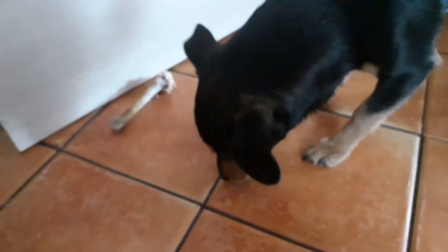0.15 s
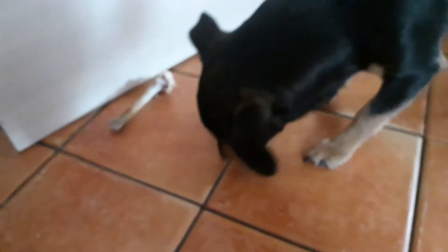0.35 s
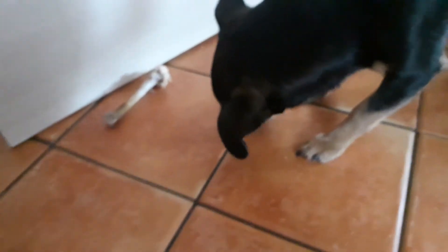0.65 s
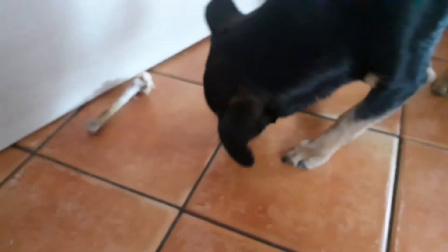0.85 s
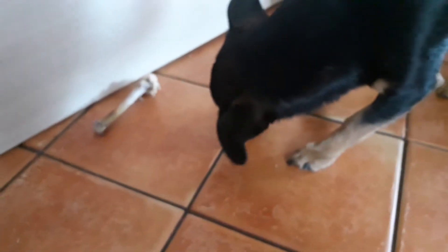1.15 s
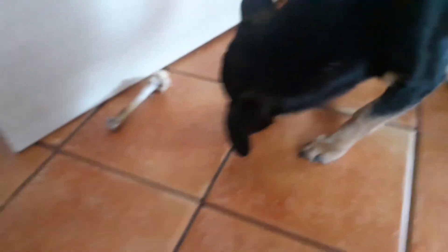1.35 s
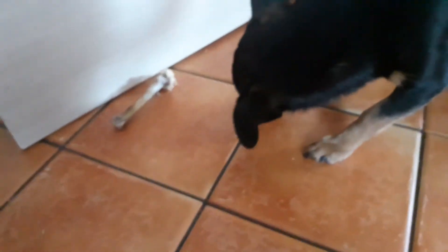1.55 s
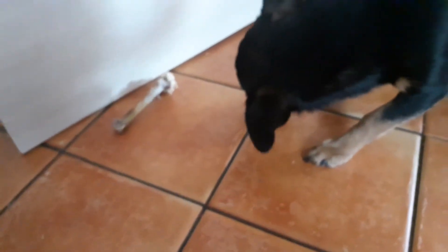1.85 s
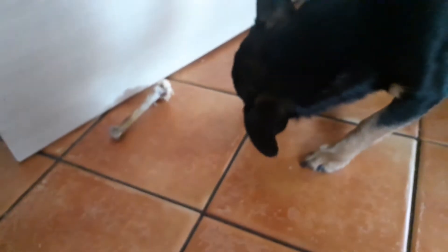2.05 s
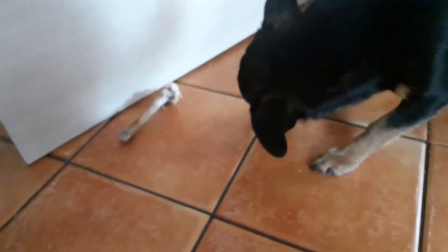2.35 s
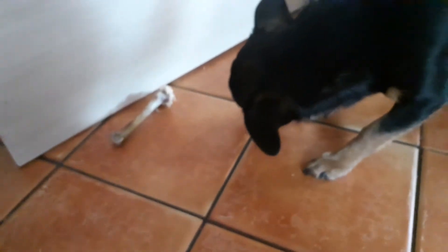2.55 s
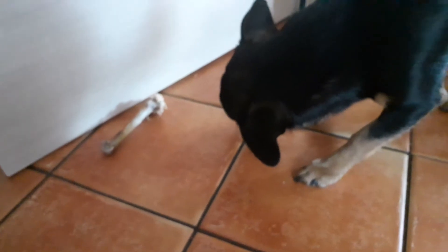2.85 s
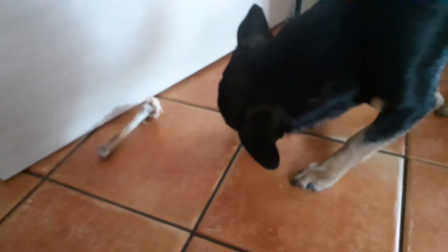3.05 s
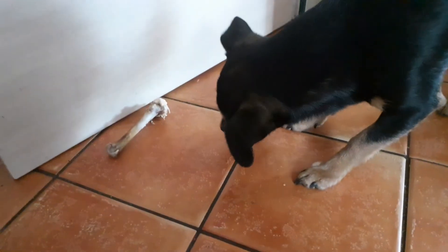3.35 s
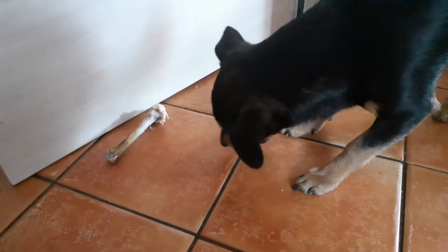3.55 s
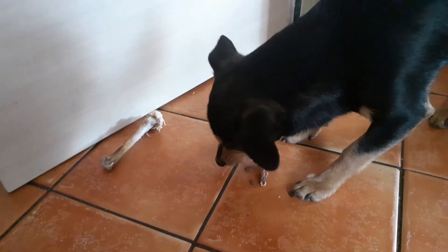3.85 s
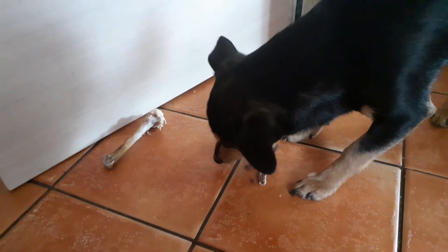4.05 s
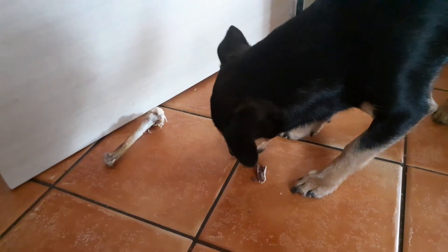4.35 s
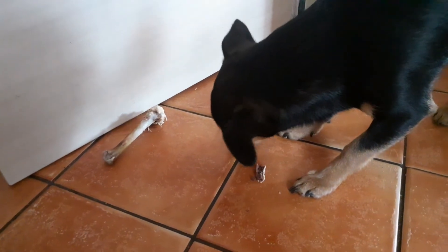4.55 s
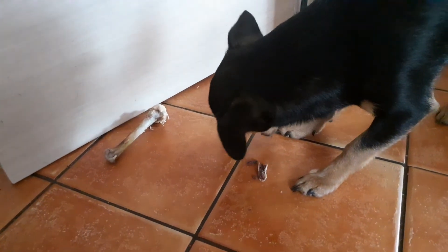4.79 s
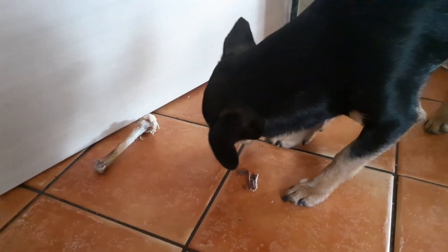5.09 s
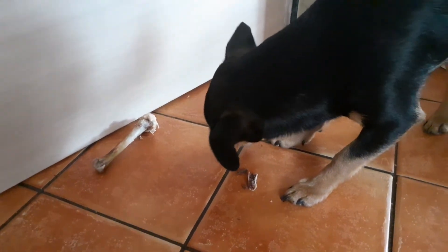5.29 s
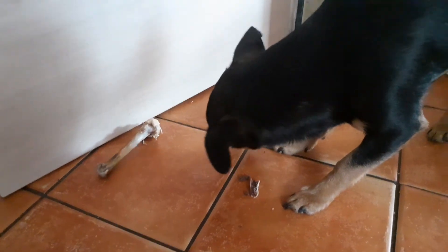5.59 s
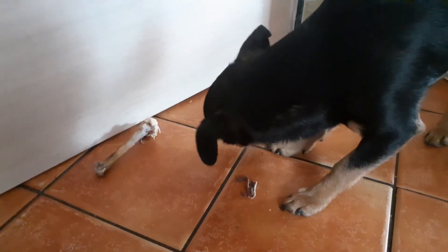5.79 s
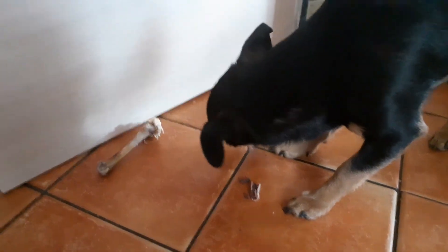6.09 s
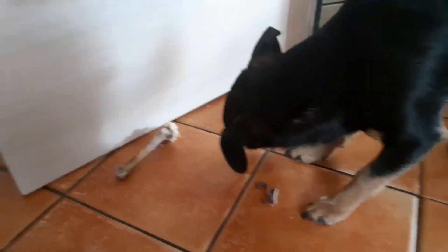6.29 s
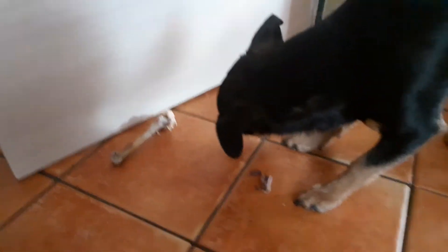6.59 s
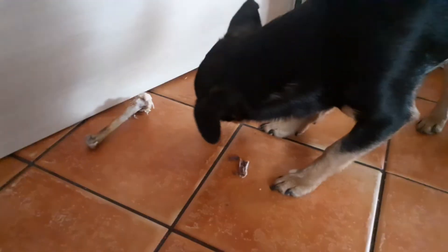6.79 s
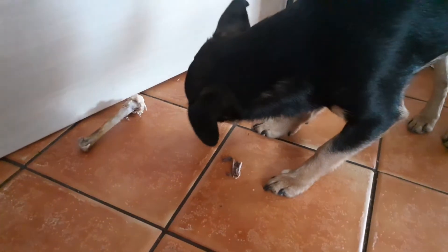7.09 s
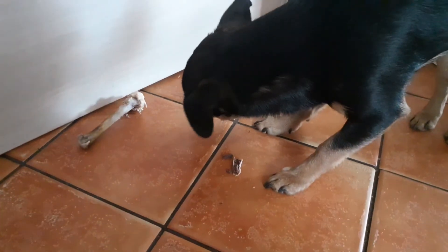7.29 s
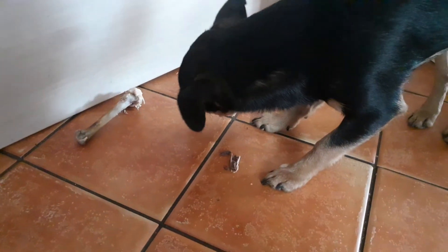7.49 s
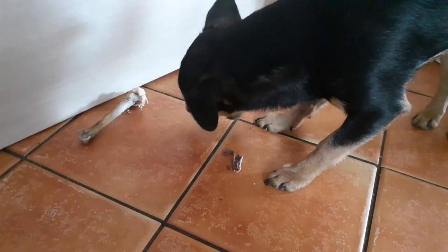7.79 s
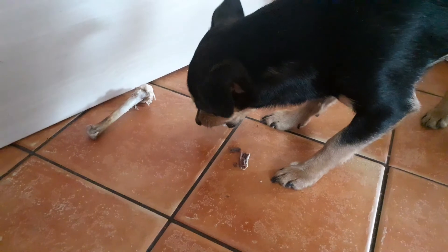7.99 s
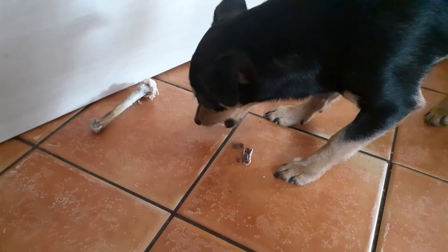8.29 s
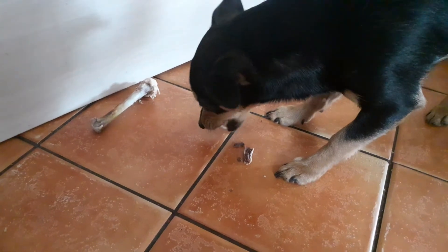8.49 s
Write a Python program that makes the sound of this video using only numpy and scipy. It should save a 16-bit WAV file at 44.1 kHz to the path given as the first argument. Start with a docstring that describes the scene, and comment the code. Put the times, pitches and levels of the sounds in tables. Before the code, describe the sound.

A dog chews a hard bone up close, with sharp irregular cracks and soft wet mouth clicks in a small tiled room.

```python
"""A dog cracks a hard bone between its back teeth, close to a small stereo microphone in a small tiled room.
Each crack is a short burst of fractures that rings the bone and the hollow of the mouth; the jaw knocks
under hard bites. Spit clicks, smacks and squelches in between; late on come a dull thump and a low grunt.
The tiles answer with near echoes and a short bright tail, over a distant low hum and a faint hiss."""
import sys
import numpy as np
from scipy import signal
from scipy.fft import rfft, irfft
from scipy.io import wavfile
from scipy.ndimage import uniform_filter1d

SR = 44100
rng = np.random.default_rng(int(sys.argv[2]) if len(sys.argv) > 2 else 0)


def transcribe(u):
    """Save the signal u as a 16-bit wav file named by the first command-line argument.

    u: samples, shape (n,) or (channels, n), limited to [-1, 1]; the rate is SR.
    q: integer samples, one column per channel.
    """
    v = np.clip(np.atleast_2d(u).T, -1, 1)
    q = np.round(v * 32767).astype(np.int16)
    wavfile.write(sys.argv[1], SR, q)


N = 381024

# cracks, levels relative: t/s, bone level/dB, bright splinter level/dB, mouth hollow level/dB,
# hollow f/Hz, f/Hz of the piece that breaks off
CRACKS = [(0.018, -46, -67, -39, 1480, 4200), (0.0288, -50, -48, -35.5, 1510, 4200),
          (0.312, -45.5, -43, -47.5, 1080, 3070), (0.398, -49, -70, -40.5, 1490, 2800),
          (0.9234, -40.5, -43.5, -46, 1290, 2940), (1.6638, -53, -52, -53.5, 1710, 2900),
          (1.703, -44, -44, -45, 2020, 2700), (1.846, -43, -44, -49, 1910, 3000),
          (1.8571, -27.5, -23, -33, 1830, 7600), (1.917, -27.5, -25.5, -33.5, 1850, 10900),
          (1.949, -28.5, -22.5, -41, 1960, 8400), (1.984, -27.5, -34, -49, 1650, 3430),
          (1.9891, -24, -18, -29.5, 1900, 9300), (2.0059, -22.5, -19.5, -33, 1970, 10800),
          (2.166, -43.5, -37.5, -64, 2030, 5300), (2.238, -38, -25.5, -40, 1640, 4200),
          (2.3278, -30.5, -25.5, -44.5, 1560, 12500), (2.4576, -60, -59, -50, 1540, 2700),
          (2.4767, -45.5, -39.5, -70, 1610, 8100), (2.708, -47, -42.5, -59, 1270, 14000),
          (2.7742, -35, -27.5, -42, 1440, 3220), (2.8826, -42.5, -38.5, -55.5, 1500, 6950),
          (2.9633, -46.5, -44.5, -76, 1210, 5640), (3.037, -48, -41, -62, 1540, 6300),
          (3.0702, -15, -13.5, -23, 1913, 5830), (3.3594, -66, -60, -51.5, 1760, 4950),
          (3.45, -68, -70, -58.5, 1560, 3170), (3.5453, -55, -62, -58, 2090, 5100),
          (3.6972, -53, -62, -49.5, 1800, 2700), (4.0168, -59, -87.5, -59, 1830, 2700),
          (4.0933, -47, -49.5, -54.5, 2640, 3480), (4.181, -47.5, -42, -48, 1730, 7000),
          (4.2428, -52, -43.5, -45, 1280, 10040), (4.5007, -44, -43, -46.5, 1530, 5650),
          (4.8381, -54, -47.5, -46.5, 1840, 8200), (4.9155, -39.5, -34, -40.5, 1830, 2700),
          (5.0332, -20.5, -22.5, -38, 2500, 6330), (5.1228, -12, -10.5, -24, 1520, 5300),
          (5.1971, -19, -15.5, -18.5, 1590, 5460), (5.264, -22.5, -19, -36.5, 1520, 3430),
          (5.3001, -32, -42, -25, 1593, 2700), (5.412, -40, -50, -51, 1720, 4050),
          (5.5482, -42, -43, -79, 1660, 4800), (5.6121, -64, -56, -53.5, 1580, 5000),
          (5.702, -40, -43.5, -53, 1700, 6200), (5.7948, -48.5, -39.5, -60, 1730, 5300),
          (5.817, -42.5, -48, -52.5, 1990, 3170), (6.0627, -45.5, -37, -62, 1690, 5860),
          (6.0864, -50, -47, -46.5, 2610, 2970), (6.4919, -53, -46, -53, 1694, 4900),
          (6.653, -54.5, -51.5, -52.5, 1570, 2700), (7.228, -68, -55, -55, 1750, 6200),
          (7.2618, -55, -53, -57, 1680, 5500), (7.3043, -23, -13, -22.5, 1593, 8300),
          (7.3618, -32.5, -46, -40, 1460, 5600), (7.4104, -20, -19.5, -34, 1700, 4800),
          (7.8155, -40, -41.5, -55, 1680, 5300), (8.2591, -34.5, -34, -56, 2170, 3360),
          (8.322, -46, -45, -53, 1740, 5800), (8.3684, -64, -58, -48.5, 1650, 2700),
          (8.528, -45.5, -39.5, -60, 1820, 5250), (8.5676, -43.5, -43, -66, 1630, 5840)]
# edges of half-octave bands: f/Hz
BAND_EDGES = 30 * 2 ** np.arange(0, 9.6, .5)


def from_db(db):
    """Gain of a level in dB."""
    return 10 ** (np.asarray(db) / 20)


def unit_rms(x):
    """The signal scaled to rms 1."""
    return x / np.sqrt(np.mean(x ** 2) + 1e-20)


def in_time(rows):
    """Each column after t/s, interpolated sample by sample."""
    times, *columns = np.transpose(rows)
    return [np.interp(np.arange(N) / SR, times, column) for column in columns]


def at_hz(points, hz):
    """A curve read on a log frequency axis."""
    freqs, values = np.transpose(points)
    return np.interp(np.log(hz), np.log(freqs), values)


def band(x, low, high):
    """Band-pass from low to high Hz."""
    return signal.sosfilt(signal.butter(2, [low, high], "band", fs=SR, output="sos"), x)


def resonate(x, hz, width_hz):
    """A resonance with gain 1 at its peak."""
    r = np.exp(-np.pi * width_hz / SR)
    poles = [1, -2 * r * np.cos(2 * np.pi * hz / SR), r * r]
    return signal.lfilter([(1 - r * r) / 2, 0, (r * r - 1) / 2], poles, x + 1e-18)


def drift(rate_hz):
    """A slow random wander with spread 1, drawn every 40 samples."""
    r = np.exp(-80 * np.pi * rate_hz / SR)
    slow = signal.lfilter([1], [1, -2 * r, r * r], rng.standard_normal(N // 40 + 2002))[2000:]
    return np.interp(np.arange(N) / 40, np.arange(len(slow)), unit_rms(slow))


def add(track, s, sound):
    """Mixes a sound in at s seconds."""
    i = round(s * SR)
    track[i:i + len(sound)] += sound[:N - i]


def banded_noise(spectrum, flicker_db):
    """Half-octave bands of stereo noise, each with its own level and flicker; rms 1."""
    # the channels are most alike in the bass: f/Hz, left-right correlation
    likeness = [(40, 0.87), (300, 0.78), (1000, 0.25), (3000, 0.091), (16000, 0.05)]
    out, white = 0, rng.standard_normal((2, 2, N))
    for k, (low, high) in enumerate(zip(BAND_EDGES, np.minimum(BAND_EDGES[1:], .45 * SR))):
        mid, side = band(white[k % 2], low, high)
        hz = np.sqrt(low * high)
        alike = at_hz(likeness, hz)
        gain = from_db(at_hz(spectrum, hz) + flicker_db * drift(8.9))
        out = out + gain * (np.sqrt(1 + alike) * mid + np.sqrt(1 - alike) * side * [[1], [-1]])
    return unit_rms(out)


def hum():
    """Low room tone with the wavering lines of a distant appliance, a little to the left."""
    # room tone spectrum: f/Hz, relative density/dB
    spectrum = [(18, -43), (30, -13.5), (99, -1.5), (128, 2.5), (211, -13.5), (248, 1), (296, -12),
                (416, -10), (478, -11.5), (1400, -14), (1610, -17), (2210, -24.5), (3500, -37.5),
                (4550, -64), (7700, -120)]
    # its slow rise and fall: t/s, level/dB
    levels = [(0.0, -57), (5.4, -58.5), (8.64, -54.5)]
    # motor lines: f/Hz, level/dB
    lines = [(128, -69), (256, -74.5), (413, -75.5)]
    level_db, = in_time(levels)
    tone = from_db(level_db) * banded_noise(spectrum, flicker_db=2.5)
    motor = sum(from_db(db) * unit_rms(resonate(rng.standard_normal(N), hz, 2.6)) for hz, db in lines)
    return (tone + motor) * from_db([[.8], [-.8]])


def hiss():
    """A faint, wide, nearly steady hiss."""
    # hiss spectrum: f/Hz, relative density/dB
    spectrum = [(880, -37.5), (1500, -9), (2240, -9.5), (3250, -12.5), (4270, -15), (7980, -15),
                (9420, -31.5), (11600, -0.5), (15500, -19)]
    return from_db(-69.5) * banded_noise(spectrum, flicker_db=.6)


def chewing():
    """Gain of the wet clicks: steady chewing plus the splinters that crunch on after each crack."""
    # chewing effort: t/s, click level/dB
    effort = [(0.0, -69), (1.3, -69.5), (2.2, -67), (2.75, -72.5), (3.6, -72.5), (3.95, -77.5),
              (4.3, -70.5), (4.9, -65.5), (5.75, -72), (6.0, -64.5), (6.3, -73), (6.75, -67), (8.64, -69.5)]
    crumble_db, crumble_t60_s = -24.5, .1
    chew_db, = in_time(effort)
    starts = np.zeros(N)
    for s, bone_db, *_ in CRACKS:
        starts[round(s * SR)] = from_db(bone_db + crumble_db)
    crumbling = signal.lfilter([1], [1, -from_db(-60 / (crumble_t60_s * SR))], starts)
    return from_db(chew_db) + crumbling


def wet_clicks(gain):
    """Spit and grit click in clumps, each ringing a few cycles; the lowest also ring the resting mouth."""
    sizes = from_db(4.5 * np.minimum(rng.exponential(1, N), 4)) * rng.choice([-1, 1], N)
    clicks = sizes * (rng.random(N) < 1500 * from_db(8 * drift(15)) / SR)
    pitches, pitch_index = np.geomspace(1800, 13000, 10), rng.integers(0, 10, N)
    rings = sum(resonate(clicks * (pitch_index == k), hz, .39 * hz) * from_db(-3 * abs(np.log2(hz / 5000)))
                for k, hz in enumerate(pitches))
    hollow = from_db(4.5) * resonate(clicks * (pitch_index == 0), hz=1700, width_hz=250)
    return gain * unit_rms(rings + hollow)


def fracture(noise, grit, t60_s, rise_s=.0016):
    """A break spreads fast and dies in uneven snaps; it pushes evenly at all pitches, with energy 1."""
    t = np.arange(len(noise)) / SR
    burst = noise * from_db(4.4 * grit) * (1 - np.exp(-t / rise_s)) * from_db(-60 * t / t60_s)
    spectrum = rfft(burst)
    smooth_power = uniform_filter1d(np.abs(spectrum) ** 2, size=40)
    even = irfft(spectrum / np.sqrt(smooth_power), len(t))
    return even / np.sqrt(np.sum(even ** 2))


def struck(hz, t60_s, rise_s, sag_per_s=0):
    """A dying sine with a soft start, peak 1; its pitch can sag as the contact softens."""
    t = np.arange(round(.12 * SR)) / SR
    phase = 2 * np.pi * np.cumsum(hz / (1 + sag_per_s * t)) / SR
    ring = np.cos(phase) * from_db(-60 * t / t60_s) * (1 - np.exp(-t / rise_s))
    return ring / np.abs(ring).max()


def cracks():
    """Fractures ring bone and mouth: gives bone on axis, smoother bone all round, and the mouth hollow."""
    # bone modes: f/Hz, width/Hz before the jaws damp them, relative level/dB
    modes = [(2700, 367, -3.5), (4200, 740, -0.5), (5300, 400, 2.5), (6000, 710, 2), (8400, 650, -0.6),
             (11640, 2000, 1.5), (12500, 1600, 1.5), (15000, 980, -6)]
    bright_from_hz, piece_db, piece_width_oct = 7000, 6, .33
    bursts = rng.standard_normal((len(CRACKS), 2, round(.06 * SR)))
    scatters_db = rng.normal(0, 1.5, (len(CRACKS), len(modes)))
    drives, hollow = np.zeros((len(modes), 2, N)), np.zeros(N)
    for crack, (noise, grit), scatter_db in zip(CRACKS, bursts, scatters_db):
        s, bone_db, bright_db, hollow_db, hollow_hz, piece_hz = crack
        burst = fracture(noise, grit, t60_s=.009, rise_s=.0006)
        for k, (hz, _, mode_db) in enumerate(modes):
            # modes near the pitch of the breaking piece are driven harder
            boost_db = piece_db * np.exp(-(np.log2(hz / piece_hz) / piece_width_oct) ** 2)
            level_db = bright_db if hz > bright_from_hz else bone_db
            gain = from_db(level_db + mode_db + boost_db + scatter_db[k])
            add(drives[k, 0], s, burst * gain)
            drives[k, 1, round(s * SR)] += gain
        # the first push rings the hollow cleanly, the later snaps roughen it
        add(hollow, s, from_db(hollow_db + 6.5) * struck(hollow_hz, t60_s=.017, rise_s=.00013))
        add(hollow, s, from_db(hollow_db + 31.5) * resonate(burst, hollow_hz, width_hz=350))
    # damp bone held in the jaws rings only briefly
    rings = sum(resonate(drives[k], hz, max(width, 1400)) * (-1) ** k
                for k, (hz, width, _) in enumerate(modes))
    on_axis, all_round = from_db(26.5) * rings
    return on_axis, all_round, hollow


def echoes(x):
    """Near tiles and wall throw the sound back from alternate sides."""
    # reflections: t/s, left level/dB, right level/dB
    reflections = [(.0013, -12, -12.5), (.0029, -13.5, -8.5), (.0052, -11.5, -8.5), (.0141, -18.5, -19)]
    response = np.zeros((2, round(.02 * SR)))
    for k, (s, left_db, right_db) in enumerate(reflections):
        response[0, round(s * SR)] = from_db(left_db)
        response[1, round(s * SR) + 7 * (-1) ** k] = from_db(right_db)
    return signal.oaconvolve(x[None], response, axes=1)[:, :N]


def room_tail(x, tail_db):
    """The tiled room's diffuse tail builds up and dies band by band, its own in each channel."""
    # reverberation time: f/Hz, T60/s
    decay = [(200, 0.42), (1400, 0.27), (4000, 0.28), (10000, 0.26), (16000, 0.44)]
    # colour of the tail: f/Hz, relative level/dB
    colour = [(200, 5.2), (1400, 7.5), (4000, 5), (10000, -1.5), (16000, -10)]
    t = np.arange(round(.5 * SR)) / SR
    white = rng.standard_normal((2, len(t)))
    tail = sum(band(white, low, high) * from_db(at_hz(colour, low) - 60 * t / at_hz(decay, low))
               for low, high in zip(BAND_EDGES[4:], np.minimum(BAND_EDGES[5:], .45 * SR)))
    build_up = 1 - np.exp(-t / .007)
    return signal.fftconvolve(x[None], from_db(tail_db) * tail * build_up, axes=1)[:, :N]


def smacks():
    """A film of spit on tongue and lips tears in a few milliseconds of broad fizz."""
    # tearing films: t/s, relative level/dB, resonance f/Hz
    tears = [(0.0666, -39, 2800), (0.1298, -41, 4500), (0.344, -34.5, 3030), (1.2301, -46.5, 13300),
             (1.3346, -36.5, 4180), (1.5588, -45.5, 10300), (2.146, -36, 2880), (2.231, -35, 12000),
             (2.292, -44, 12000), (2.642, -41.5, 12500), (2.863, -44, 7900), (3.018, -43, 8350),
             (3.5234, -46, 6670), (3.5612, -38.5, 3560), (3.6216, -43, 8400), (4.38, -44.5, 4780),
             (4.6346, -43.5, 5430), (5.468, -44, 11700), (5.5104, -37, 7900), (5.912, -41, 2760),
             (6.8506, -38.5, 8430), (7.005, -46, 6800), (7.1227, -44, 6900), (7.524, -44.5, 11000),
             (7.6403, -46, 11960), (7.682, -47.5, 6140), (7.7184, -43, 4870), (7.8394, -50, 6020),
             (7.9637, -48.5, 8100), (8.1467, -43, 5700), (8.205, -44.5, 6030), (8.3344, -41.5, 5650),
             (8.5857, -42.5, 6770)]
    out, bursts = np.zeros(N), rng.standard_normal((len(tears), 2, round(.06 * SR)))
    for (s, level_db, hz), (noise, grit) in zip(tears, bursts):
        add(out, s, from_db(level_db + 24) * resonate(fracture(noise, grit, t60_s=.011), hz, .36 * hz))
    return band(out, 4600, 20000)


def jaw_knocks():
    """The jaw takes the blow of a hard bite: a low push with a rough, broad thud on top."""
    # blows: t/s, relative level/dB, starting f/Hz
    blows = [(0.921, -40.5, 520), (2.326, -42.5, 246), (3.069, -25, 437), (5.032, -31.5, 330),
             (5.194, -37, 535), (5.297, -28, 534), (6.653, -42, 248), (7.302, -30.5, 421),
             (7.41, -35.5, 436)]
    out, bursts = np.zeros(N), rng.standard_normal((len(blows), 2, round(.06 * SR)))
    for (s, level_db, hz), (noise, grit) in zip(blows, bursts):
        push = struck(hz, t60_s=.011, rise_s=.0021, sag_per_s=27)
        thud = resonate(fracture(noise, grit, t60_s=.074), hz=410, width_hz=590)
        add(out, s, from_db(level_db) * push)
        add(out, s, from_db(level_db + 31) * thud)
    return band(out, 250, 2400)


def squelches():
    """Tiny bubbles burst in a pocket of spit between tongue and teeth, swelling and fading."""
    # runs of bubbles: t/s, length/s, level/dB, centre f/Hz
    runs = [(2.551, 0.084, -67, 1700), (3.373, 0.069, -66.5, 1730), (3.659, 0.027, -61, 1810),
            (7.19, 0.037, -65, 5800), (8.109, 0.029, -57.5, 5800), (8.469, 0.064, -61, 5150),
            (8.571, .02, -51, 11500)]
    out, bursts = np.zeros(N), rng.standard_normal((len(runs), 2, round(.15 * SR)))
    for (s, length, level_db, hz), (noise, grit) in zip(runs, bursts):
        bubbling = unit_rms(resonate(noise * (grit > 2), hz, width_hz=.15 * hz))
        swell = np.sin(np.pi * np.clip(np.arange(len(noise)) / SR / length, 0, 1))
        add(out, s, from_db(level_db) * bubbling * np.sqrt(np.abs(swell)))
    return out


def thump():
    """A dull push through the floor close by, falling fast in pitch."""
    # blow: t/s, level/dB, starting f/Hz
    blows = [(6.9032, -36, 261)]
    out = np.zeros(N)
    for s, level_db, hz in blows:
        add(out, s, from_db(level_db) * struck(hz, t60_s=.018, rise_s=.0004, sag_per_s=170))
    return out


def grunt():
    """Two soft partials from a closed throat."""
    # course of the voice: t/s, f/Hz, level/dB
    contour = [(8.21, 133, -87), (8.264, 131, -43.5), (8.4, 148, -76)]
    pitch, level_db = in_time(contour)
    t, phase = np.arange(N) / SR, 2 * np.pi * np.cumsum(pitch) / SR
    sounding = (t > contour[0][0]) & (t < contour[-1][0])
    partials = np.sin(phase) + from_db(1.5) * np.sin(2 * phase)
    return sounding * from_db(level_db + 2 * drift(42)) * partials


def mic_pair(x, left_db, lag):
    """The left capsule hears a source left_db louder and lag samples sooner than the right."""
    delayed = np.interp(np.arange(N) - lag, np.arange(N), x)
    return np.array([x * from_db(left_db / 2), delayed * from_db(-left_db / 2)])


def scene():
    """The dog close to the microphone, the thump off to the right, the tiled room all around."""
    bone, bone_all_round, hollow = cracks()
    spit = smacks() + squelches() + wet_clicks(chewing())
    jaw = jaw_knocks()
    direct = mic_pair(jaw + grunt(), left_db=2.5, lag=1.3)
    direct += mic_pair(bone + spit, left_db=-1.5, lag=1)
    direct += mic_pair(hollow, left_db=10.5, lag=3)
    direct += mic_pair(thump(), left_db=-24.5, lag=0)
    mouth = spit + from_db(-6) * hollow + from_db(-5) * jaw
    reflected = echoes(bone + mouth) + room_tail(bone_all_round + mouth, tail_db=-27)
    return direct + reflected + hum() + hiss()


def record(dry):
    """The small microphone loses the deepest bass and dips in the treble; peaks clip, the top is cut."""
    thin = signal.sosfilt(signal.butter(3, 42, "high", fs=SR, output="sos"), dry)
    dipped = thin - .47 * resonate(thin, hz=9400, width_hz=2000)
    clipped = np.clip(dipped, -.93, .93)
    return signal.sosfilt(signal.cheby2(14, 80, 16900, fs=SR, output="sos"), clipped)


dry = scene()
out = record(dry)
transcribe(out)
```